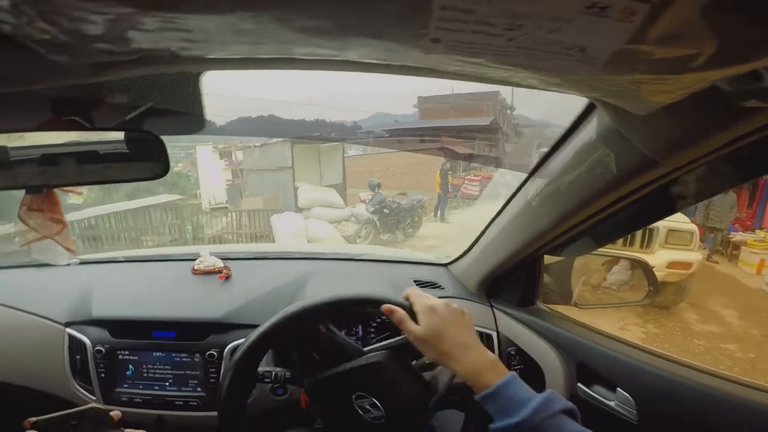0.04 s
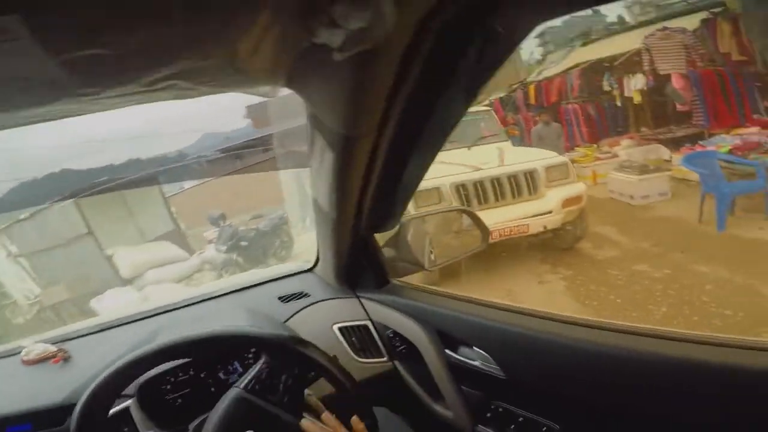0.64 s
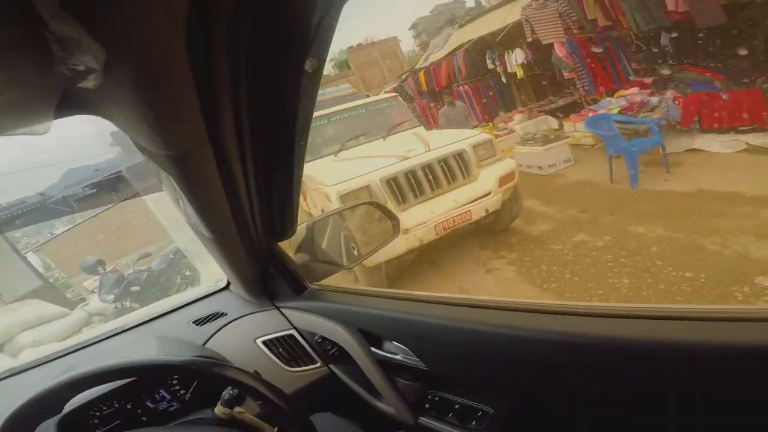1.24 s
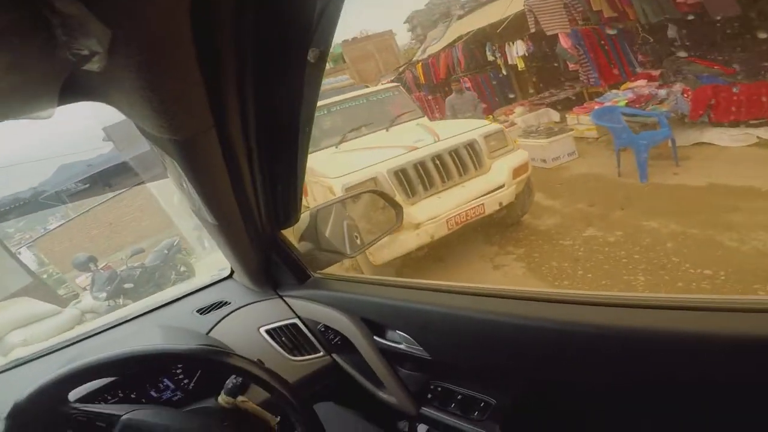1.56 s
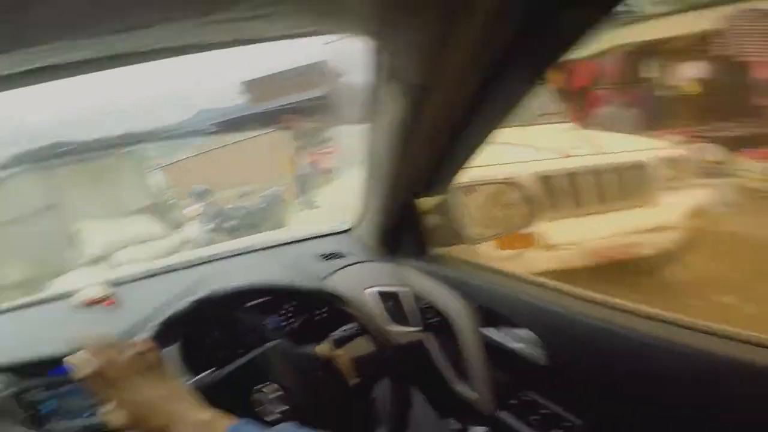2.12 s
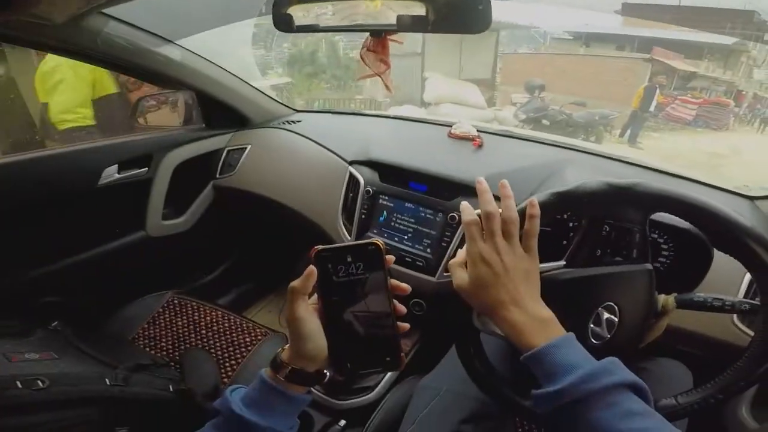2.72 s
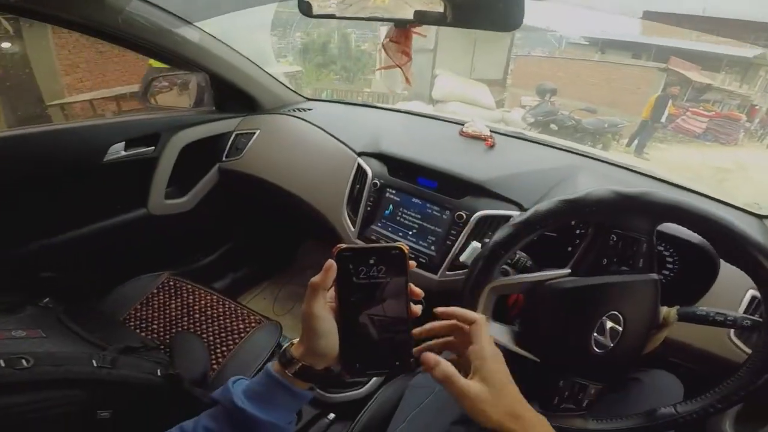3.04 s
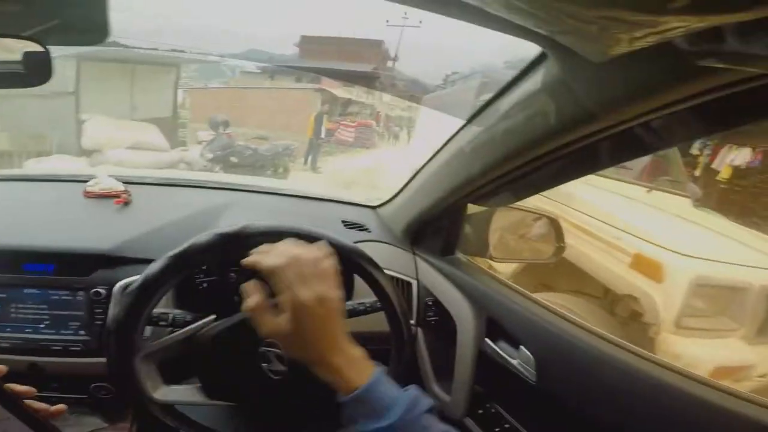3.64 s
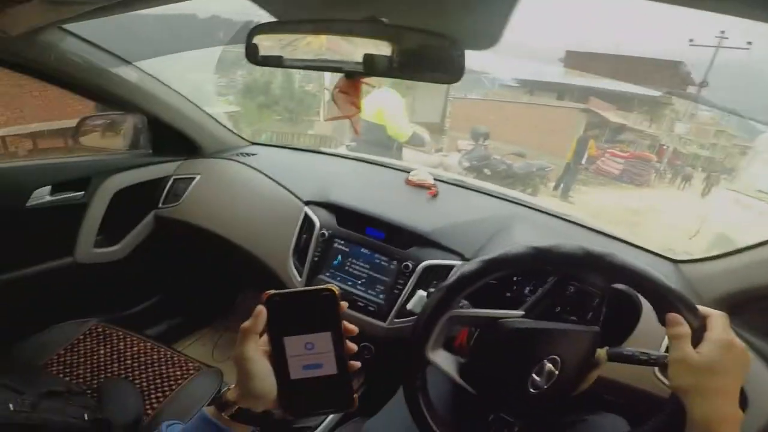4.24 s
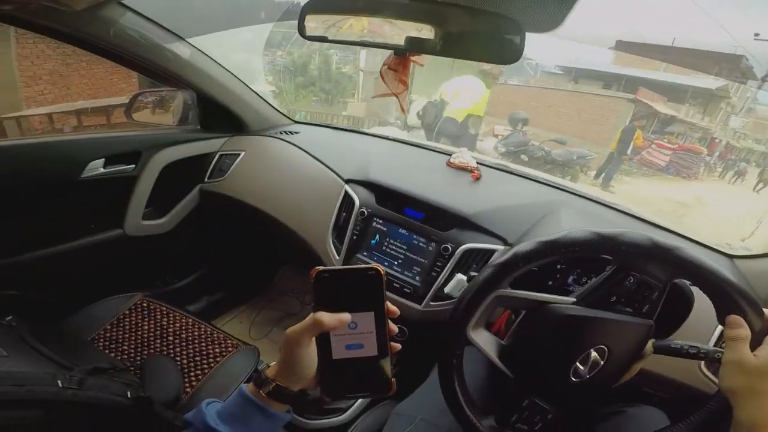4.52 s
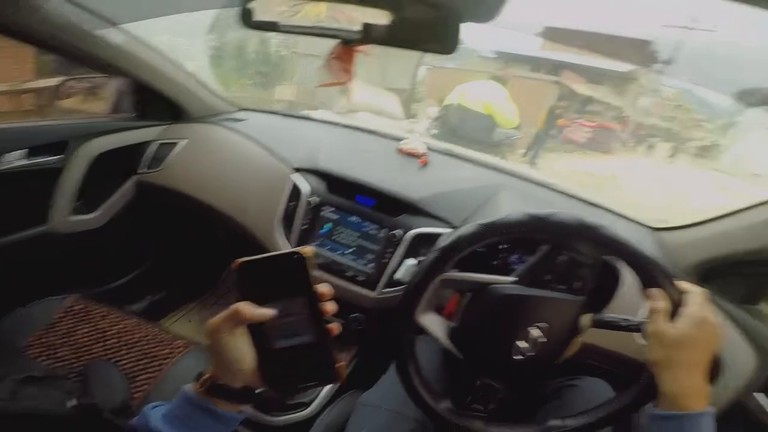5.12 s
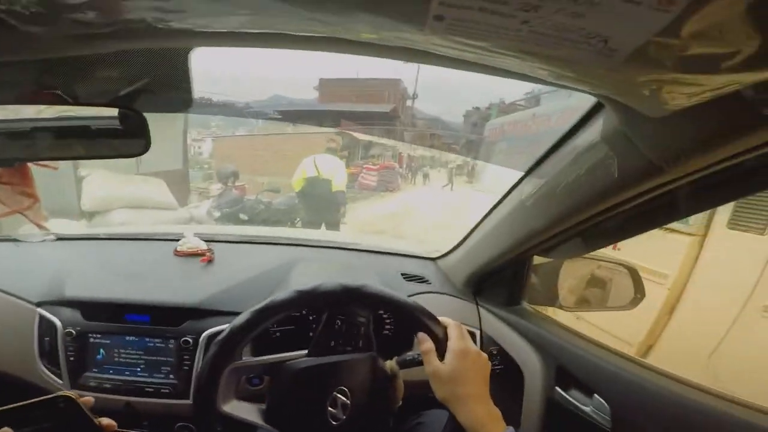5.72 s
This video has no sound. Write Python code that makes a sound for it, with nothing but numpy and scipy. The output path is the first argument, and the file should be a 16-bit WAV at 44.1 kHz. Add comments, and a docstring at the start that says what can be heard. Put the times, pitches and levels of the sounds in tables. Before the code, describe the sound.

A deep boom and tyre rumble fill the cabin of a car creeping along a rough dirt street, heard from between the front seats for about six seconds. The boom is strongest at the start and swells with each bump, over light crunching grit and a low engine drone. From about 0.5 to 2 seconds soft diesel clatter comes through the side window, and the engine hum grows from 1 second until nearly 3, with a faint belt chirr. A door panel knocks lightly around 0.6, 1.5 and 1.7 seconds. Brief low drones, soft swishes and faint squeaks come and go. A small plastic click arrives with a jolt at 3.8 seconds, and loose fittings knock at 4 and 4.8. At 5 seconds the wheels drop into a rut with a heavy double thump as the engine swells. The brakes chirp faintly at 5.5 and 5.8 seconds.

```python
"""A deep boom and tyre rumble, heard inside a car creeping along a rough dirt street. The body rocks on
its springs and swings the cabin air; lumps shake the floor, ruts thump the wheels, grit crunches.
Engine firings make a low drone, with diesel clatter at the side window and a slipping belt.
Brief cabin drones and swishes come and go, trim knocks and ticks, something squeaks faintly;
near the end the brakes drag and chirp."""
import sys
import numpy as np
from scipy import signal
from scipy.fft import rfft, irfft, next_fast_len
from scipy.io import wavfile
from scipy.ndimage import uniform_filter1d, minimum_filter1d, map_coordinates

SR = 44100
rng = np.random.default_rng(int(sys.argv[2]) if len(sys.argv) > 2 else 0)


def persist_wave(psi):
    """Save psi, clipped to +-1, as 16-bit WAV."""
    counts = np.round(np.clip(psi, -1, 1) * 32767).astype(np.int16)
    wavfile.write(sys.argv[1], SR, np.atleast_2d(counts).T)


N = 263277
TIME_S = np.arange(N) / SR

# Noise spectra: f/Hz, relative density/dB
HISS_SPECTRUM = [(1000, -40), (3500, 1.5), (5000, 2.5), (6800, 3), (8500, 5.5), (10300, 5), (11800, -1.5),
                 (13500, -5.5), (15000, -18)]
CLATTER_SPECTRUM = [(500, 0), (850, 10), (1000, 6.5), (1120, 2.5), (1230, 6.5), (1400, 0.5), (1550, 1.5),
                    (1800, 1.5), (1980, -5), (2400, -6.5), (2900, -11.5), (4000, -16), (10000, -23.5),
                    (14000, -56)]
SHUDDER_SPECTRUM = [(20, -62), (32, -18), (42, -0.5), (55, -5), (75, -5), (100, -4.5), (120, -7),
                    (170, -28)]
RUMBLE_SPECTRUM = [(70, -63), (110, -10.5), (150, 4), (195, -2), (230, -3.5), (320, -8), (420, -14),
                   (700, -37.5)]
ROAR_SPECTRUM = [(200, -37), (350, -1.5), (450, -1), (620, 0.5), (760, -6.5), (900, -4.5), (1020, -13),
                 (1150, -14), (1500, -18.5), (1650, -21), (1780, -19.5), (2000, -20), (2500, -25),
                 (2950, -26.5), (3400, -28), (3750, -29.5), (4100, -30), (6000, -40.5)]

# Short noise swishes and one bright click: t/s, level/dB, centre f/Hz, t60/s
SWISHES_AND_CLICK = [(2.035, -49.5, 2545, 0.29), (2.213, -50, 2300, 0.15), (3.196, -63, 2390, 0.77),
                     (3.783, -54, 6500, 0.076), (5.005, -55.5, 2020, 0.4), (4.97, -43.5, 840, 0.53),
                     (5.08, -45, 1040, 0.28)]
# Plastic trim: t/s, level/dB, centre f/Hz, edge level/dB, t60/s
TRIM_TICKS = [(.227, -46, 2400, -53, 0.12), (.59, -50, 1510, -58, 0.045), (2.105, -59, 6500, -58, .02),
              (3.791, -52.5, 3200, -53, 0.08)]
# Faint squeaks: t/s, length/s, f/Hz, glide/Hz, level/dB, jitter/share of f
FAINT_SQUEAKS = [(.66, .11, 3600, 280, -59, .03), (2.92, .18, 4700, 60, -65.5, .003),
                 (5.335, .15, 3835, 0, -56.5, .003), (5.37, .07, 7084, 0, -69, .002)]
# Low cabin drones and a rough band of low rumble: columns as for the squeaks
DRONES_AND_RUMBLE = [(0, 1.1, 290.6, -60.5, -36.5, 0.102), (.55, 0.67, 384, 3, -41, .02),
                     (.8, .9, 346, -3, -40, 0.016), (.9, 0.93, 197, -1, -28, .03),
                     (3.22, 0.53, 343.6, 8, -37.5, 0.014), (3.3, 0.8, 149.6, 14.5, -29.5, 0.096),
                     (4.8, 0.85, 385.8, -1, -39, .007), (5.35, 0.83, 1219, -16, -57, 0.0067)]
# Dragging brakes: t/s, length/s, level/dB, rasp/share of power, jitter/share of f
BRAKE_CHIRPS = [(5.5, .21, -59.5, .35, .01), (5.775, .165, -57, .14, .004)]
# Brake modes: f/Hz, level/dB
BRAKE_RING = [(2850, -8), (3117, -6), (3305, 0), (3467, -2), (3714, -6), (3806, 0)]

# Blows (small hard part at the hand, loose fitting, door panel, wheel in a rut): t/s, level/dB
PART_SNAPS = [(3.792, -45)]
FITTING_KNOCKS = [(4.035, -24), (4.845, -24)]
PANEL_KNOCKS = [(.625, -33.5), (1.506, -39), (1.747, -30.5), (4.078, -37), (5.547, -40)]
RUT_DROPS = [(4.959, -7.5), (5.013, -5)]
# Modes these blows ring: f/Hz, level/dB, t60/s
PART_RING = [(3580, 0, .035), (3700, -3, 0.08), (5566, -16, .06), (8160, -8, .08), (9000, -12, .05)]
FITTING_RING = [(451, 0.5, 0.076)]
PANEL_RING = [(807, -6, .08), (900, 0, .08), (1010, -1, .08), (1240, -9, .06), (1590, -13, .06),
              (2310, -20, .05)]
BODY_RING = [(91.3, -8.5, 0.33), (132, -5.5, 0.041), (209, -17, 0.041), (278, -20.5, 0.15),
             (467, -20.5, 0.15), (580, -21, 0.019)]

# Firing rate, just above idle: t/s, f/Hz
FIRING_RATE = [(.82, 42), (1.08, 43.3), (1.35, 43.3), (1.5, 42), (4.7, 41.8), (5.0, 42.9), (5.97, 42.5)]
# Engine load; throb as it lugs at low revs; clatter at the side window; belt slip: t/s, level/dB
ENGINE_LOAD = [(0, -11), (.82, -8.5), (1.08, -1), (1.5, 2), (2.15, -1.5), (2.72, 0), (2.9, -6), (4.7, -6.5),
               (5.0, 3.5), (5.25, 1), (5.4, -4), (5.97, -1)]
THROB_LEVEL = [(0, -11.5), (.26, -13), (.42, -29), (.6, -17), (2.7, -25.5), (3.5, -32), (4.7, -18.5),
               (5.3, -16.5), (5.97, -20)]
WINDOW_LEVEL = [(0.06, -63.5), (0.47, -54), (0.5, -49), (2.08, -48.5), (2.43, -57), (3.0, -60), (4.08, -54),
                (4.2, -62), (4.92, -52), (5.0, -51.5), (5.47, -55), (5.9, -57.5)]
BELT_LEVEL = [(.45, -80), (.8, -66), (1.05, -56.5), (1.16, -65), (1.39, -59), (1.46, -65), (1.57, -59.5),
              (1.7, -68), (2.3, -70), (2.9, -85)]
# Engine orders: multiple of firing rate, level/dB
THROB_ORDERS = [(1, -5), (1.5, -12.5)]
HUM_ORDERS = [(2, -5.5), (3, 0.5), (4, -47), (4.5, -11.5), (5, -16.5), (6, -33.5), (7, -20)]
WHINE_ORDERS = [(8, -2.5), (9, 0), (10, -8.5), (11, -13), (12, -14)]
# Hum, then whine, under load and rocking on the mounts: level/dB, load slope/(dB/dB), jolt slope/(dB/dB)
ORDER_RESPONSE = [(-29.5, 1.3, -0.35), (-48.5, .5, 0.15)]
# Engine block modes: f/Hz, nominal width/Hz, level/dB
BLOCK_RING = [(3380, 230, 0), (3710, 150, 0)]

# Rough patches hit the suspension: t/s, level/dB re plain dirt
ROAD_JOLTS = [(0, 9.5), (.15, 11), (0.541, 9), (.66, 3), (.83, -1.5), (1.18, 9.5), (2.26, -2), (3.6, -1.5),
              (3.81, 8.5), (4.96, 4), (5.02, 6.5), (5.2, 7), (5.38, 1), (5.6, 5.5), (5.8, 5.5)]
# Cabin boom as the car rocks: t/s, f/Hz, level/dB
BOOM_SWAY = [(0, 32.08, -9), (.5, 27.48, -12), (1.8, 28.98, -13), (2.15, 25.77, -13), (2.7, 25.95, -13.5),
             (2.85, 25.08, -24), (4.4, 26.51, -19), (5.3, 27.44, -22.5), (5.97, 26.56, -14.5)]
# Boom swells through hollows: t/s, length/s, level/dB
BOOM_HEAVES = [(0.174, 0.29, -8.5), (0.523, 0.13, -8), (0.686, 0.19, -10.5), (1.258, 0.14, -8),
               (1.594, 0.21, -11.5), (2.893, 0.28, -14.5), (3.767, 0.28, -14), (4.45, .2, -14.5),
               (4.647, 0.34, -5.5), (5.052, 0.29, -10), (5.424, 0.093, -12.5)]


def amp(db):
    """dB to gain."""
    return 10 ** (np.asarray(db) / 20)


def unit(x):
    """Scale to rms 1."""
    return x / np.sqrt(np.mean(x ** 2) + 1e-20)


def curve(rows, column=1):
    """Table column, linearly interpolated over time."""
    table = np.transpose(rows)
    return np.interp(TIME_S, table[0], table[column])


def colour(x, spectrum):
    """Shape x by a spectrum with 12 dB/octave skirts; rms 1."""
    size = next_fast_len(N)
    hz, db = np.transpose(spectrum)
    f_hz = np.fft.rfftfreq(size, 1 / SR) + 1e-3
    skirts = np.minimum(f_hz / hz[0], 1) ** 2 * np.minimum(hz[-1] / f_hz, 1) ** 2
    gain = amp(np.interp(np.log(f_hz), np.log(hz), db))
    return unit(irfft(rfft(x, size) * skirts * gain, size)[:N])


def drift(rate_hz):
    """Smooth random curve, rate_hz knots a second; rms 1."""
    knots = rng.standard_normal(1024)
    coarse_s = TIME_S[::64]
    spline = map_coordinates(knots, [coarse_s * rate_hz], order=3, mode="wrap")
    return unit(np.interp(TIME_S, coarse_s, spline))


def add(mix, start_s, sound):
    """Mix a sound in at start_s."""
    part = mix[max(round(start_s * SR), 0):][:len(sound)]
    part += sound[:len(part)]


def decay(t_s, t60_s):
    """Exponential fall, 60 dB in t60_s."""
    return np.exp(-np.log(1000) * t_s / t60_s)


def strike(t_s, rise_s, t60_s):
    """Linear rise, exponential fall."""
    return np.clip(t_s / rise_s, 0, 1) * decay(np.maximum(t_s - rise_s, 0), t60_s)


def noise_band(hz, width_oct):
    """1 s of noise around hz; rms 1."""
    f_hz = np.fft.rfftfreq(SR, 1 / SR) + 1
    bell = np.exp(-.5 * (np.log2(f_hz / hz) / width_oct) ** 2)
    return unit(irfft(rfft(rng.standard_normal(SR)) * bell, SR))


def resonate(x, hz, stage_width_hz):
    """Two equal resonators in series, peak gain 1."""
    peak = signal.iirpeak(hz, hz / stage_width_hz, fs=SR)
    return signal.lfilter(*peak, signal.lfilter(*peak, x))


def thumps(blows, modes, rise_s=0.00091):
    """Each blow rings the same damped modes."""
    out, t_s = np.zeros(N), TIME_S[:SR // 2]
    ring = sum(amp(db) * np.sin(2 * np.pi * hz * t_s) * decay(t_s, t60_s) for hz, db, t60_s in modes)
    onset = 1 - np.exp(-(t_s / rise_s) ** 2)
    for start_s, db in blows:
        add(out, start_s, amp(db) * ring * onset)
    return out


def cabin(x, wet=.3, t60_s=.09, top_hz=2000):
    """Glass and trim return a short, boxy tail; seats absorb its treble."""
    t_s = TIME_S[:SR // 10]
    tail = rng.standard_normal(len(t_s)) * decay(t_s, t60_s)
    dull_tail = signal.lfilter(*signal.butter(2, top_hz, fs=SR), tail / np.linalg.norm(tail))
    return x + wet * signal.oaconvolve(x, dull_tail)[:N]


def shaking_db(rise_s=0.013, t60_s=0.9):
    """Road shake re plain dirt; jolts add in power."""
    jolts = (amp(db) * strike(TIME_S - start_s, rise_s, t60_s) for start_s, db in ROAD_JOLTS)
    return 10 * np.log10(1 + sum(jolt ** 2 for jolt in jolts))


def hiss(level_db=-63):
    """Faint, even background hiss."""
    return amp(level_db) * colour(rng.standard_normal(N), HISS_SPECTRUM)


def swishes_and_click(width_oct=0.31, rise_share=0.044):
    """Noise bands swell and die; the shortest is a bright click."""
    out = np.zeros(N)
    for start_s, db, hz, t60_s in SWISHES_AND_CLICK:
        envelope = strike(TIME_S[:SR], rise_share * t60_s, t60_s)
        add(out, start_s, amp(db) * noise_band(hz, width_oct) * envelope)
    return out


def ticks(rise_s=0.0016, edge_hz=4600, top_hz=11000):
    """Plastic trim shifts: a short noise band with a bright edge."""
    out = np.zeros(N)
    for start_s, db, hz, edge_db, t60_s in TRIM_TICKS:
        tick = amp(db) * noise_band(hz, width_oct=0.46)
        edge = amp(edge_db) * noise_band(edge_hz, width_oct=1)
        add(out, start_s, (tick + edge) * strike(TIME_S[:SR], rise_s, t60_s))
    return signal.sosfilt(signal.butter(4, top_hz, fs=SR, output="sos"), out)


def brakes(rasp_hz=3400, rasp_oct=0.15, judder_db=1.5, waver_db=2.5):
    """Pads stick and slip: wavering brake modes over a juddering rasp."""
    out = np.zeros(N)
    for start_s, length_s, db, rasp, jitter in BRAKE_CHIRPS:
        ring = np.zeros(SR)
        for hz, mode_db in BRAKE_RING:
            pitch_hz = hz * (1 + jitter * drift(200)[:SR])
            gain = amp(mode_db + waver_db * drift(35)[:SR])
            ring += gain * np.sin(2 * np.pi * np.cumsum(pitch_hz) / SR)
        friction = noise_band(rasp_hz, rasp_oct) * amp(judder_db * drift(69)[:SR])
        chirp = np.sqrt(1 - rasp) * unit(ring) + np.sqrt(rasp) * friction
        arch = np.sin(np.pi * np.minimum(TIME_S[:SR] / length_s, 1))
        add(out, start_s, amp(db) * chirp * arch)
    return out


def grit(level_db=-52, rate_hz=45, spread_db=10.0, decay_s=0.0035):
    """Small stones knock under the tread, dulled by the doors."""
    chance, size, noise = rng.random(N), rng.exponential(1, N), rng.standard_normal(N)
    stones = (chance < rate_hz / SR) * amp(spread_db * np.minimum(size, 2))
    crunch = signal.lfilter([1], [1, -np.exp(-1 / (decay_s * SR))], stones) * noise
    return amp(level_db) * colour(crunch, [(300, 17.5), (700, 1.5), (1300, -13.5), (2500, -16.5)])


def door(crack_db=-19, crack_hz=1500):
    """The hollow door panel knocks: a short crack, then its modes."""
    cracks = np.zeros(N)
    envelope = strike(TIME_S[:SR], rise_s=.001, t60_s=0.08)
    for start_s, db in PANEL_KNOCKS:
        add(cracks, start_s, amp(db + crack_db) * noise_band(crack_hz, width_oct=1.4) * envelope)
    return cracks + thumps(PANEL_KNOCKS, PANEL_RING)


def unsteady_tones(rows, flutter_db=2.5):
    """Tones flutter as they fade in and out; strong jitter smears one into a rough band."""
    out = np.zeros(N)
    for start_s, length_s, hz, glide_hz, db, jitter in rows:
        count = int(length_s * SR)
        progress = np.linspace(0, 1, count)
        pitch_hz = (hz + glide_hz * progress) * (1 + jitter * drift(170)[:count])
        envelope = amp(db + flutter_db * drift(110)[:count]) * np.sin(np.pi * progress) ** 2
        add(out, start_s, envelope * np.sin(2 * np.pi * np.cumsum(pitch_hz) / SR))
    return out


def belt(firing, hz=3410, jitter_hz=135, slip_db=2.2):
    """The belt slips unevenly, more at each firing: a rough chirr."""
    pitch_hz = hz + jitter_hz * drift(600)
    slip = (1 + .4 * firing) * amp(slip_db * drift(40))
    chirr = slip * np.sin(2 * np.pi * np.cumsum(pitch_hz) / SR)
    return amp(curve(BELT_LEVEL)) * unit(chirr)


def diesel_clatter(firing, gain_db=1.05, ring_db=-67.0, ring_slope=0.45, flicker_db=1.3):
    """Each firing rattles and rings the block; heard at the side window."""
    window_db = curve(WINDOW_LEVEL)
    rattle, *mode_drives = rng.standard_normal((1 + len(BLOCK_RING), N)) * (1 + firing)
    clatter = amp(gain_db + window_db) * colour(cabin(rattle), CLATTER_SPECTRUM)
    ring = sum(amp(db + flicker_db * drift(14)) * resonate(drive, hz, 2 * width_hz)
               for drive, (hz, width_hz, db) in zip(mode_drives, BLOCK_RING))
    return clatter + amp(ring_db + ring_slope * (window_db - window_db.mean())) * unit(ring)


def orders(cycles, levels, waver_db, rough_db=1.8, loose_cycles=.035):
    """Multiples of the firing rate; a loose idle varies each in level and phase."""
    out = np.zeros(N)
    for multiple, db in levels:
        gain = amp(db + waver_db * drift(8) + rough_db * drift(45))
        out += gain * np.cos(2 * np.pi * (multiple * cycles + loose_cycles * drift(12)))
    return np.sqrt(2) * out


def engine(wander_hz=0.1946):
    """Firings push the body (throb, hum, whine) and pulse the clatter and belt."""
    cycles = np.cumsum(curve(FIRING_RATE) + wander_hz * drift(4)) / SR
    load_db, jolt_db = curve(ENGINE_LOAD), shaking_db()
    drone = amp(curve(THROB_LEVEL)) * orders(cycles, THROB_ORDERS, waver_db=2.0)
    for (db, load_slope, jolt_slope), levels in zip(ORDER_RESPONSE, [HUM_ORDERS, WHINE_ORDERS]):
        gain = amp(db + load_slope * load_db + jolt_slope * jolt_db)
        drone += gain * orders(cycles, levels, waver_db=1.5)
    firing = np.cos(np.pi * cycles) ** 4
    return drone + diesel_clatter(firing) + belt(firing)


def tyres(shudder_db=-28.0, rumble_db=-32.0, roar_db=-42, lumps_db=1, deep_hz=75, deep_db=6.5):
    """Dirt shakes suspension and floor; the tread roars above. Jolts lift the bass most."""
    shake, roll, tread = rng.standard_normal((3, N))
    lumps, jolt_db = amp(lumps_db * drift(35)), shaking_db()
    floor = colour(shake, SHUDDER_SPECTRUM)
    deep = signal.filtfilt(*signal.butter(1, deep_hz, fs=SR), floor)
    shudder = amp(shudder_db) * (floor + amp(deep_db) * (amp(jolt_db) - 1) * deep)
    rumble = amp(rumble_db + 0.12 * jolt_db) * colour(roll * lumps, RUMBLE_SPECTRUM)
    roar = amp(roar_db + 0.03 * jolt_db) * colour(cabin(tread * lumps), ROAR_SPECTRUM)
    return shudder + rumble + roar


def boom(gain_db=-1.5, wander_cycles=0.0096, throb_db=0.8):
    """Cabin air swings at its lowest resonance; each body heave adds an arch of power."""
    cycles = np.cumsum(curve(BOOM_SWAY)) / SR + wander_cycles * drift(3.4)
    power = amp(curve(BOOM_SWAY, column=2)) ** 2
    for start_s, length_s, db in BOOM_HEAVES:
        progress = np.clip((TIME_S - start_s) / length_s, 0, 1)
        power += (amp(db) * np.sin(np.pi * progress)) ** 2
    gain = amp(gain_db + throb_db * drift(9.5))
    return gain * np.sqrt(2 * power) * np.cos(2 * np.pi * cycles)


def scene():
    """Mono sum between the front seats."""
    road = boom() + tyres() + grit() + thumps(RUT_DROPS, BODY_RING)
    knocks = thumps(FITTING_KNOCKS, FITTING_RING) + thumps(PART_SNAPS, PART_RING) + door()
    interior = knocks + ticks() + swishes_and_click()
    tones = unsteady_tones(FAINT_SQUEAKS) + unsteady_tones(DRONES_AND_RUMBLE)
    return (road + interior + tones + brakes() + engine() + hiss())[None]


def record(dry):
    """Smooth peak limiter, brief closing fade, low-pass."""
    ceiling, hold_samples, fade_s, top_hz = .63, SR // 25, .006, 15200
    allowed = ceiling / np.maximum(abs(dry), ceiling)
    gain = uniform_filter1d(minimum_filter1d(allowed, size=hold_samples), size=hold_samples)
    fade = np.minimum((TIME_S[-1] - TIME_S) / fade_s, 1)
    lowpass = signal.firwin(511, top_hz, window=("kaiser", 9), fs=SR)
    return signal.oaconvolve(dry * gain * fade, lowpass[None], "same")


dry = scene()
out = record(dry)
persist_wave(out)
```